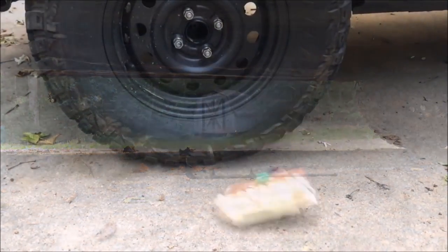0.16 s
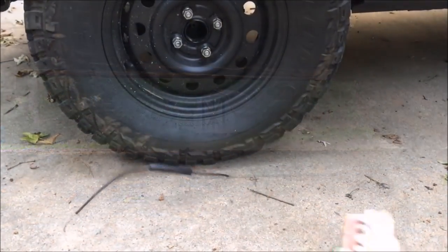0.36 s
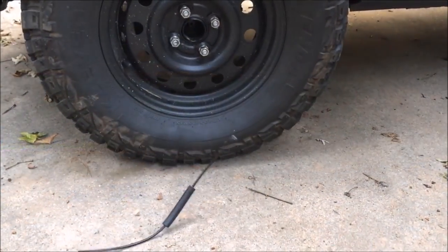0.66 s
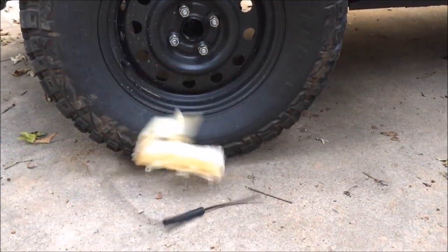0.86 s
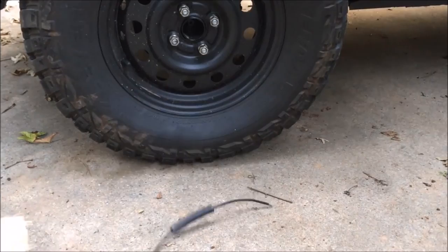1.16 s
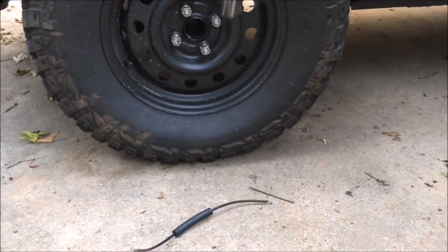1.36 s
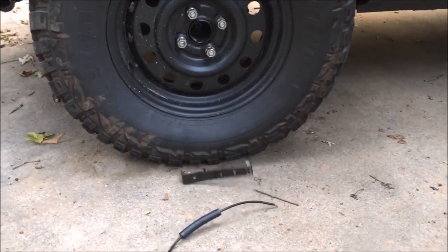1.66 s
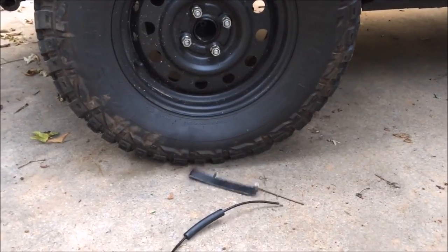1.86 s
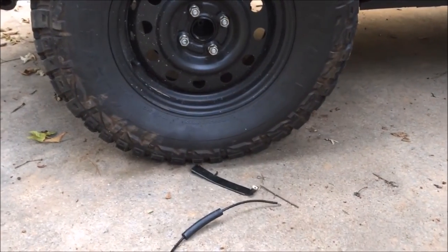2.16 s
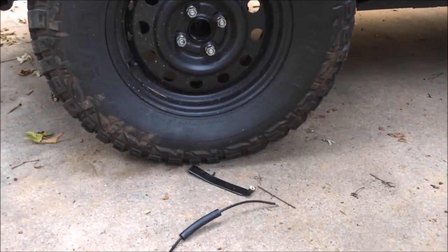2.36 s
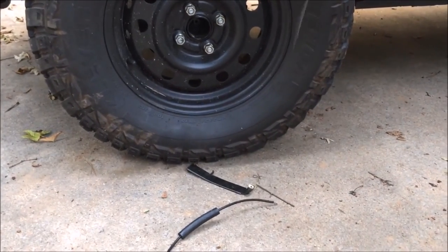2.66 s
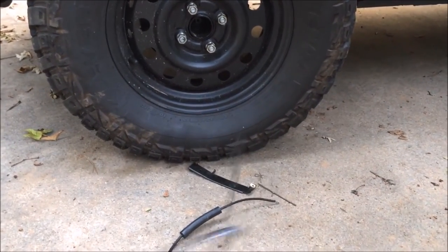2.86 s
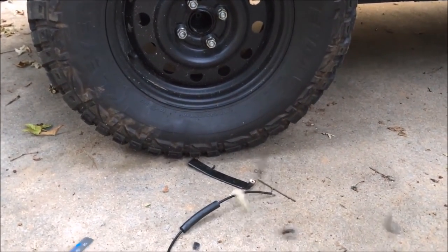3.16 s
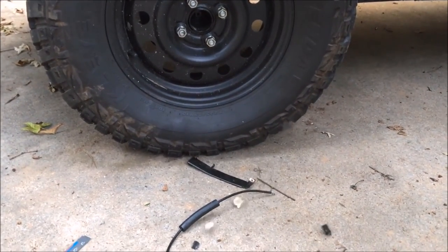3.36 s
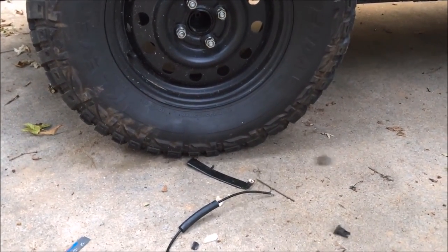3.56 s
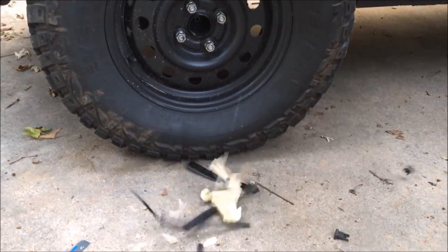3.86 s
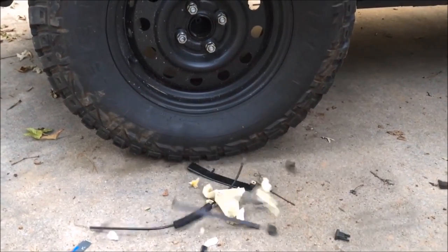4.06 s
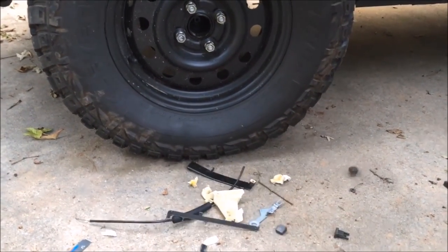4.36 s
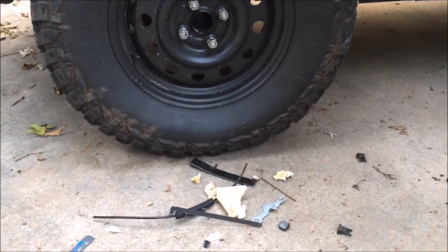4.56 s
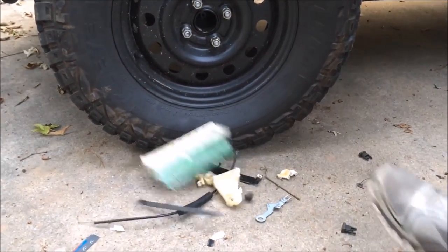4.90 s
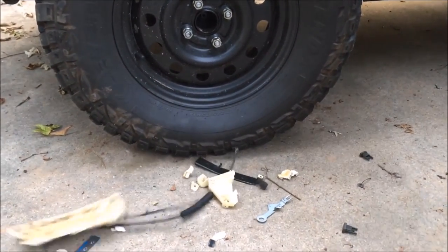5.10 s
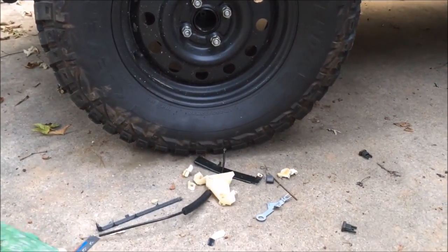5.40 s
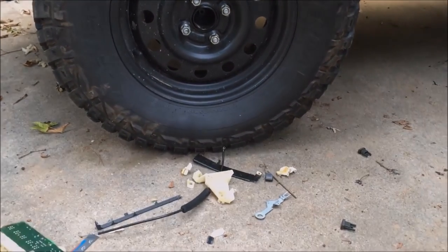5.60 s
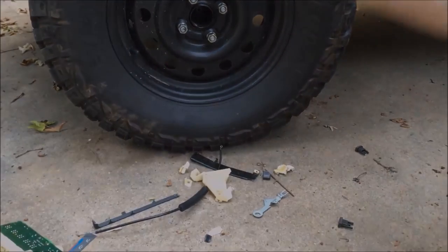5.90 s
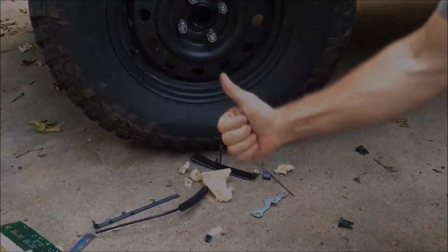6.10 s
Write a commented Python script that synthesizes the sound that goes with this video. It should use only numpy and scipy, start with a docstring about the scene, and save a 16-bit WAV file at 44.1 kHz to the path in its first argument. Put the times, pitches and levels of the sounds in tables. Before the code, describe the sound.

Broken plastic appliance parts drop onto a concrete driveway: hollow knocks, a raked rattle, bright bouncing pings, then a last burst of dry clacks.

```python
"""A hollow plastic casing scrapes, then tumbles over a concrete driveway beside a parked tyre, ringing on its modes.
Strips and boards of the broken appliance clack and bounce as bursts of noise and brief modes.
A heap is raked up as dense random grains; a short squeak and small bits that ping are close pairs of modes.
A garage close by adds a short tail of decaying noise; the loudest blows overload the microphone."""
import sys
import numpy as np
from scipy import signal
from scipy.fft import rfft, irfft, next_fast_len
from scipy.io import wavfile
from scipy.ndimage import uniform_filter1d

SR = 44100
rng = np.random.default_rng(int(sys.argv[2]) if len(sys.argv) > 2 else 0)


def digitize_waveform(pressure):
    """Quantize a signal to 16-bit integers and store it at the path in sys.argv[1].

    Rows of a 2-D input are taken as channels; values are limited to [-1, 1].
    """
    field = np.atleast_2d(pressure).T
    bounded = np.clip(field, -1, 1)
    quanta = np.round(bounded * 32767).astype(np.int16)
    wavfile.write(sys.argv[1], SR, quanta)


N = 275138
HIT_T = np.arange(SR * 3 // 4) / SR   # time axis of one hit [s]
BLOW_S = .025   # reference length for the energy of a hit

# casing modes: mode_hz, relative_db
CASING_MODES = [(160, -25), (320, -15.5), (458, -15.5), (662, -4.5), (700, -6), (903, -4.5), (975, -2.5),
                (1062, -1), (1166, 0), (1270, -6), (1335, -7.5), (1570, -1), (1640, -2), (1725, -9),
                (1878, 4), (1930, 2.5), (2070, -3.5), (2270, -2.5), (2500, -8.5), (2925, -1), (3450, -11.5),
                (3950, -13.5)]
# spectrum of plastic on concrete: freq_hz, relative_db
CLACK_SPECTRUM = [(200, -4.5), (560, -5), (840, -4), (1200, 1.5), (2350, 9), (3000, -2), (4300, -0.5),
                  (4800, -5), (5700, 4), (7700, -6), (10700, -10.5), (16000, -13.5)]


def amp(db):
    """Decibels to gain."""
    return 10 ** (np.asarray(db) / 20)


def unit(x):
    """Scale to rms 1."""
    return x / np.sqrt(np.mean(x ** 2) + 1e-20)


def unit_blow(x):
    """Scale a hit to the energy of rms 1 over BLOW_S."""
    return x / np.sqrt(np.sum(x ** 2) / (BLOW_S * SR) + 1e-20)


def add(track, start_s, sound):
    """Mix a sound into the track at a time."""
    start = max(0, round(start_s * SR))
    track[start:start + len(sound)] += sound[:len(track) - start]


def colour(x, points):
    """Filter by a spectrum of (freq_hz, db) points and scale to rms 1."""
    hz, db = np.transpose(points)
    size = next_fast_len(len(x))
    bins_hz = np.fft.rfftfreq(size, 1 / SR) + 1   # + 1 avoids log(0)
    gain = amp(np.interp(np.log(bins_hz), np.log(hz), db))
    return unit(irfft(rfft(x, size) * gain, size)[:len(x)])


def band(x, low_hz, high_hz):
    """Causal band-pass, its upper edge kept below Nyquist."""
    edges_hz = [low_hz, min(high_hz, .47 * SR)]
    return signal.sosfilt(signal.butter(3, edges_hz, "band", fs=SR, output="sos"), x)


def level(curve):
    """Gain in time from a curve of (time_s, db); silent outside it."""
    return amp(np.interp(np.arange(N) / SR, *np.transpose(curve), left=-np.inf, right=-np.inf))


def swells(rows, curve=1.5):
    """Gain of gestures that build, hold and die; curve > 1 starts attacks and ends releases more gently."""
    t = np.arange(N) / SR
    gain = np.zeros(N)
    for start_s, db, attack_s, hold_s, release_s in rows:
        rise = (t - start_s) / attack_s
        fall = 1 - (t - start_s - attack_s - hold_s) / release_s
        gain += amp(db) * np.clip(np.minimum(rise, fall), 0, 1) ** curve
    return gain


def fade(t60_s, rise_s, hold_s):
    """Envelope of a contact: it builds, lasts while the piece slaps down, then dies."""
    decay_db = -60 * np.clip((HIT_T - hold_s) / t60_s, 0, 4)
    return np.minimum(HIT_T / rise_s, 1) * amp(decay_db)


def ring(modes, t60_s, scatter_db, damping=0.64):
    """Damped modes (hz, db) of scattered strength; t60_s holds at 2 kHz, lower modes last longer."""
    out = np.zeros(len(HIT_T))
    for hz, db in modes:
        life_s = t60_s * (2000 / hz) ** damping
        t = HIT_T[:int(2 * life_s * SR)]
        strength = amp(db + scatter_db * rng.standard_normal())
        tone = np.sin(2 * np.pi * (hz * t + rng.random()))
        out[:len(t)] += strength * amp(-60 * t / life_s) * tone
    return out


def contact(t60_s, rise_s, hold_s):
    """Plastic on gritty concrete: countless short, overlapping modes, made as a noise burst."""
    return colour(rng.standard_normal(len(HIT_T)), CLACK_SPECTRUM) * fade(t60_s, rise_s, hold_s)


def echoed(sound):
    """A hit plus two short echoes, each with a random delay and a random sign."""
    # echoes from slab and tyre: typical_delay_s, level_db
    echoes = [(.0024, -3.5), (.006, -9)]
    out = np.zeros(len(sound))
    add(out, 0, sound)
    for delay_s, db in echoes:
        add(out, delay_s * rng.uniform(.65, 1.35), amp(db) * sound * rng.choice([-1, 1]))
    return out


def outdoor_air(level_db=-50):
    """Steady outdoor hum and hiss: filtered noise."""
    # air spectrum: freq_hz, relative_db
    air_spectrum = [(25, -20.5), (70, -4.5), (102, 2.5), (160, -15), (400, -25.5), (1800, -28.5),
                    (5000, -29.5), (9000, -40.5), (16000, -39)]
    return amp(level_db) * colour(rng.standard_normal(N), air_spectrum)


def garage(x, wet_db=-19.0, low_t60_s=0.4, high_t60_s=0.3):
    """Diffuse reflections from the vehicle and the garage; the treble dies first."""
    noise = rng.standard_normal(len(HIT_T))
    low = band(noise, 100, 2900) * fade(low_t60_s, rise_s=0.0068, hold_s=0)
    high = band(noise, 1900, 17000) * fade(high_t60_s, rise_s=0.024, hold_s=0)
    tail = low + high
    return amp(wet_db) * signal.fftconvolve(x, tail / np.sqrt(np.sum(tail ** 2)))[:N]


def grains(per_s, low_hz, high_hz, cycles, spread_db, count=24):
    """Random tiny collisions ring fragments of many sizes for a set number of cycles; each also ticks."""
    sizes = amp(spread_db * np.minimum(rng.exponential(1, N), 3)) * rng.choice([-1, 1], N)
    clicks = sizes * (rng.random(N) < per_s / SR)
    fragment = rng.integers(0, count, N)
    ringing = np.zeros(N)
    for k, hz in enumerate(np.geomspace(low_hz, high_hz, count)):
        radius = amp(-60 * hz / (cycles * SR))   # -60 dB after `cycles` periods
        w = 2 * np.pi * hz / SR
        struck = clicks * (fragment == k) + 1e-18
        ringing += signal.lfilter([hz * np.sin(w)], [1, -2 * radius * np.cos(w), radius * radius], struck)
    return unit(ringing) + .8 * unit(clicks) + .3 * rng.standard_normal(N)


def heap_rattle(clumping_db=3.4):
    """Big pieces rattle in the raked heap, catching and letting go in clumps."""
    # strokes that stir or rake: start_s, level_db, attack_s, hold_s, release_s
    strokes = [(0.44, -45.5, 0.035, .11, .05), (0.82, -43, .03, .04, 0.064), (1.44, -35.5, .06, .06, .5),
               (1.98, -48, .06, 0.31, 0.11), (2.27, -26.5, .17, 0.13, 0.49),
               (2.92, -37, 0.028, 0.031, 0.087), (3.12, -44.5, .02, 0.039, 0.083),
               (3.44, -43.5, 0.038, .1, .05), (3.6, -25, 0.029, .035, .13),
               (3.8, -36, 0.023, 0.0092, 0.029)]
    # rattle spectrum: freq_hz, relative_db
    rattle_spectrum = [(40, -10), (150, -2), (420, -3), (720, -2.5), (1050, 0), (2300, -7), (3500, -9.5),
                       (7000, -23.5)]
    collisions = grains(per_s=1100, low_hz=300, high_hz=2700, cycles=17, spread_db=2.8)
    slips = unit(uniform_filter1d(rng.standard_normal(N), size=SR // 60))
    rattle = unit(colour(collisions, rattle_spectrum) * amp(clumping_db * slips))
    return swells(strokes) * rattle


def crumb_skitter():
    """Spilled crumbs skitter over the concrete as grains spread up to a high treble."""
    # spills: start_s, level_db, attack_s, hold_s, release_s
    spills = [(0.74, -49, .05, 0.11, 0.047), (2.385, -32, 0.026, 0.15, .36), (3.58, -32.5, .06, .12, 0.072),
              (3.97, -37, 0.041, .38, 0.092), (4.9, -20, .06, .015, .07), (5.02, -39, .04, 0.35, 0.44)]
    # skitter spectrum: freq_hz, relative_db
    skitter_spectrum = [(300, -30), (800, -4.5), (1600, 0.5), (2600, 6), (3400, 1), (4700, 5.5),
                        (7000, -0.5), (10600, -8.5), (15000, -7.5)]
    collisions = grains(per_s=650, low_hz=1400, high_hz=15000, cycles=80, spread_db=3.8)
    return swells(spills) * colour(collisions, skitter_spectrum)


def heap_knocks(gain_db=-11.5):
    """Dull knocks as the heap shifts: short, heavily damped resonances."""
    # knocks: start_s, relative_db
    knocks = [(1.91, -34), (2.367, -18.5), (2.383, -14.5), (2.411, -16.5), (2.433, -12), (2.462, -16.5),
              (2.512, -16), (3.618, -19), (3.642, -16.5)]
    # heap resonances: mode_hz, relative_db
    heap_modes = [(323, -8.5), (490, -5), (711, 4.5), (1030, 4), (1350, -10), (1830, -8)]
    out = np.zeros(N)
    for start_s, db in knocks:
        knock = band(ring(heap_modes, t60_s=.016, scatter_db=3.0), 200, 2500)
        add(out, start_s, amp(db + gain_db) * unit_blow(knock))
    return out


def thumps(gain_db=-10.0):
    """Heavy pieces thump: decaying noise, mostly bass."""
    # thumps: start_s, relative_db
    thump_hits = [(0.222, -11), (0.334, -17), (1.034, -21), (1.355, -30), (1.664, -24), (3.992, -32.5),
                  (5.103, -22), (5.48, -27.5)]
    # thump spectrum: freq_hz, relative_db
    thump_spectrum = [(30, -14), (70, -3.5), (160, -0.5), (240, -1.5), (400, -18), (1000, -11.5),
                      (2500, -29.5), (6000, -56)]
    out = np.zeros(N)
    for start_s, db in thump_hits:
        noise = colour(rng.standard_normal(len(HIT_T)), thump_spectrum)
        thump = noise * fade(t60_s=0.24, rise_s=0.001, hold_s=0.0053)
        add(out, start_s, amp(db + gain_db) * unit_blow(thump))
    return out


def metal_strip():
    """A thin steel strip keeps ringing on its modes after it lands."""
    # landings: start_s, relative_db
    strip_hits = [(1.748, -36.5), (2.036, -41)]
    # strip modes: mode_hz, relative_db
    strip_modes = [(1625, 8), (1895, 6), (3914, -3), (5033, -5), (5362, -11.5), (6148, -9), (6632, -8),
                   (8635, -7), (9685, -8)]
    out = np.zeros(N)
    for start_s, db in strip_hits:
        add(out, start_s, amp(db) * ring(strip_modes, t60_s=.42, scatter_db=2.0, damping=.2))
    return out


def ringing_part(hits, modes, t60_s):
    """A struck part rings on its own modes after a 3.7 ms rise."""
    out = np.zeros(N)
    for start_s, db in hits:
        tone = ring(modes, t60_s, scatter_db=2.5, damping=.3) * np.minimum(HIT_T / 0.0037, 1)
        add(out, start_s, amp(db) * unit_blow(tone))
    return out


def rocking_board():
    """A stiff board rings briefly as it rocks on an edge."""
    # rocks: start_s, level_db
    board_hits = [(5.053, -27), (5.652, -34.5)]
    # board modes: mode_hz, relative_db
    board_modes = [(1378, -0.5), (1997, -3), (2560, 1.5), (2902, -1.5), (3440, -4), (4100, -2)]
    return ringing_part(board_hits, board_modes, t60_s=.075)


def bracket():
    """A small steel bracket jingles on its modes, longer than the board."""
    # jingles: start_s, level_db
    bracket_hits = [(4.19, -36.5), (4.294, -30.5)]
    # bracket modes: mode_hz, relative_db
    bracket_modes = [(716, -12), (2595, -1), (4619, -6), (8559, 0), (13080, -2), (14840, 4)]
    return ringing_part(bracket_hits, bracket_modes, t60_s=0.21)


def tinkles(count=32, from_s=3.0, to_s=4.8, centre_hz=4900, centre_db=-35.5):
    """Faint bounces at uneven intervals, as rows of start_s, relative_db, main_mode_hz."""
    jitter, size, pitch = rng.uniform(-1.1, 1, (count, 3)).T
    times_s = np.linspace(from_s, to_s, count) + jitter * (to_s - from_s) / count / 2
    return list(zip(times_s, centre_db + 3.0 * size, centre_hz * 2 ** (0.18 * pitch)))


def pings(ring_db=-15.5, overtone_db=-24.5, tick_db=-24.0):
    """Squeak and bouncing bits: a close pair of modes, faint overtones and a sharp tick."""
    # bounces, and one short squeak at 0.15 s: start_s, relative_db, main_mode_hz
    chirps = [(0.154, -5.5, 2320), (0.157, -8.5, 4030), (2.5386, -13, 4620), (2.5692, -14.5, 4710),
              (2.719, -21.5, 4640), (2.8568, -21.5, 4650), (3.0096, -12.5, 4320), (3.054, -19.5, 4410),
              (3.0875, -4, 4580), (3.1034, -5.5, 4620), (3.1262, -17, 4720), (3.2925, -7.5, 4660),
              (3.3363, -13.5, 4390), (3.3608, -23, 4150), (3.3882, -7.5, 4600), (3.4127, -12, 4860),
              (3.421, -15, 4620), (3.5054, -23, 3620), (3.5635, -18, 4650), (3.6768, -15, 4640),
              (3.7076, -7.5, 2730), (3.7383, -11.5, 4450), (3.7633, -13.5, 4660), (3.8698, -23, 4630),
              (3.921, -20.5, 4540), (3.9577, -19, 4600), (3.9784, -6.5, 2420), (4.0254, -3.5, 2556),
              (4.2212, -21, 4630), (4.269, -19.5, 4740), (4.336, -20, 4670), (4.5623, -16, 4770),
              (4.653, -32, 4700), (4.7452, -29.5, 5570)]
    # overtones: multiple_of_main_mode, relative_db
    bit_overtones = [(1.301, -11.5), (1.598, -12), (1.95, -4), (2.68, -9), (3.102, -7)]
    out = np.zeros(N)
    for start_s, db, main_hz in list(chirps) + tinkles():
        pair = ring([(main_hz, 0), (main_hz * .96, -7)], t60_s=.04, scatter_db=0)
        pair = unit_blow(pair * np.minimum(HIT_T / 0.0012, 1))
        upper_modes = [(main_hz * multiple, mode_db) for multiple, mode_db in bit_overtones]
        upper = unit_blow(ring(upper_modes, t60_s=0.042, scatter_db=8.0))
        burst = rng.standard_normal(len(HIT_T)) * fade(t60_s=0.063, rise_s=0.00037, hold_s=.001)
        tick = unit_blow(band(echoed(burst), 1595, 24000))
        add(out, start_s, amp(db) * (amp(ring_db) * pair + amp(overtone_db) * upper + amp(tick_db) * tick))
    return out


def clacks(gain_db=-1.5, ring_share=2.65, count=14):
    """Each flat piece gives a dry crack and brief modes of its own; its kind sets colour and decay."""
    # landings and bounces: start_s, relative_db, kind
    landings = [(0.308, -35, "clip"), (0.334, -13, "strip"), (0.362, -31.5, "strip"),
                (0.384, -19.5, "strip"), (0.436, -30.5, "strip"), (0.493, -30, "strip"),
                (0.586, -24, "strip"), (0.68, -15, "strip"), (0.705, -33, "strip"), (0.81, -33.5, "strip"),
                (0.914, -38.5, "strip"), (0.935, -32, "strip"), (0.983, -28, "strip"),
                (1.664, -18.5, "clip"), (1.746, -23.5, "clip"), (2.036, -25.5, "clip"),
                (2.061, -34, "wire"), (2.137, -37, "wire"), (2.199, -35, "wire"), (3.102, -27, "shard"),
                (3.279, -34.5, "wire"), (3.978, -24.5, "wire"), (3.989, -15.5, "wire"),
                (4.015, -18, "shard"), (4.032, -21, "shard"), (4.19, -34, "wire"), (4.294, -35.5, "wire"),
                (4.414, -32, "shard"), (4.875, -24, "strip"), (4.893, -17, "strip"), (4.94, -25, "wire"),
                (4.974, -18, "strip"), (4.987, -14.5, "shard"), (5.004, -20.5, "strip"),
                (5.062, -33, "board"), (5.088, -23.5, "strip"), (5.19, -38, "board"), (5.217, -27, "wire"),
                (5.242, -18.5, "strip"), (5.317, -27.5, "board"), (5.358, -25, "board"),
                (5.375, -19, "board"), (5.425, -38, "wire"), (5.46, -33.5, "strip"),
                (5.522, -33.5, "board"), (5.655, -36.5, "board"), (5.71, -37.5, "board"),
                (5.798, -38, "shard"), (5.82, -47, "wire"), (5.889, -44, "board"), (6.211, -48, "board")]
    # kinds of piece: body_db, crack_db, top_db, t60_s
    kinds = {"strip": (-0.5, 0.5, -3.5, .026), "clip": (-2, -2, 1, .021), "wire": (-2.5, 0, 0.33, .1),
             "shard": (-12.5, 0.5, -6.5, .03), "board": (-1.5, -9, -10.5, .034)}
    # edges between body, crack and top: edge_hz
    edges_hz = [220, 3000, 8000, 16500]
    out = np.zeros(N)
    for start_s, hit_db, kind in landings:
        *band_levels_db, t60_s = kinds[kind]
        hz = np.geomspace(1200, 15000, count) * 2 ** rng.uniform(-.15, .15, count)
        modes = zip(hz, np.interp(hz, *np.transpose(CLACK_SPECTRUM)))
        tone = ring(modes, ring_share * t60_s, scatter_db=1.0, damping=0.044)
        tone = tone * np.minimum(HIT_T / 0.00073, 1)
        crack = contact(t60_s, rise_s=0.00059, hold_s=0.002)
        hit = echoed(unit_blow(crack) + 0.57 * unit_blow(tone))
        clack = np.zeros(len(HIT_T))
        for k, db in enumerate(band_levels_db):
            part = amp(db) * unit_blow(band(hit, edges_hz[k], edges_hz[k + 1]))
            clack += part * (-1) ** k   # neighbouring bands in opposite polarity
        add(out, start_s, amp(hit_db + gain_db) * clack)
    return out


def casing_drag(scratch_db=-11.0):
    """Grit under the sliding casing keeps its modes humming: noise convolved with their ring."""
    # scrape before the tumble: time_s, level_db
    drag_curve = [(0, -29.5), (0.09, -33), (0.12, -21), (0.19, -23.5), (0.22, -45)]
    friction = rng.standard_normal(N)
    shell = band(ring(CASING_MODES, t60_s=.09, scatter_db=1), 1100, 1800)
    hum = unit(signal.fftconvolve(friction, shell)[:N])
    return level(drag_curve) * (hum + amp(scratch_db) * colour(friction, CLACK_SPECTRUM))


def casing_tumble(focus_db=9.5, focus_octaves=0.27, ring_db=-0.5, slap_db=-6.5, grit_db=-2.5):
    """The shell rings hollow; each hit favours modes near one pitch and detunes them a little."""
    # hits on the ground: start_s, relative_db, most_excited_hz, relative_scuff_db
    casing_hits = [(0.107, -16.5, 1720, -7.5), (0.138, -17, 1650, -15), (0.154, -17, 1700, -15),
                   (0.791, -28, 1460, -15), (1.034, -10, 1250, -7), (1.05, -13, 1160, -13),
                   (1.121, -25, 1880, -5), (1.218, -11.5, 1750, -20), (1.357, -3, 1580, -11),
                   (1.398, -11, 1730, -13), (1.42, -13.5, 2020, -15), (1.512, -17.5, 1390, -16),
                   (1.585, -24, 1300, -13.5), (1.606, -21.5, 1260, -14), (1.619, -20, 1240, -26),
                   (1.691, -18, 1740, -30), (1.813, -28, 1610, -6)]
    out = np.zeros(N)
    hz, db = np.transpose(CASING_MODES)
    for start_s, hit_db, main_hz, scuff_db in casing_hits:
        favour_db = focus_db * np.exp(-(np.log2(hz / main_hz) / focus_octaves) ** 2)
        detuned_hz = hz * (1 + .014 * rng.standard_normal(len(hz)))
        shell = ring(zip(detuned_hz, db + favour_db), t60_s=0.088, scatter_db=3.5, damping=.4)
        shell = unit_blow(echoed(shell))
        slap = echoed(contact(t60_s=0.072, rise_s=0.0013, hold_s=0.004))
        slap = unit_blow(band(slap, 500, 3800))
        grit = echoed(contact(t60_s=0.023, rise_s=0.00051, hold_s=0.0083))
        grit = unit_blow(band(grit, 2400, 16500))
        blow = amp(ring_db) * shell + amp(slap_db) * slap + amp(scuff_db + grit_db) * grit
        add(out, start_s, amp(hit_db) * blow)
    return out


def scene():
    """All falling pieces, their reflections and the outdoor air."""
    heap = heap_rattle() + crumb_skitter() + heap_knocks()
    ringing = metal_strip() + rocking_board() + bracket()
    pieces = heap + thumps() + ringing + pings() + clacks() + casing_drag() + casing_tumble()
    return (pieces + garage(pieces) + outdoor_air())[None]


def record(dry, top=1.4, cutoff_hz=16100):
    """The microphone flattens the loudest peaks towards top; the highest treble is cut."""
    clipped = dry / (1 + (dry / top) ** 4) ** (1 / 4)
    return signal.sosfilt(signal.ellip(10, .1, 70, cutoff_hz, fs=SR, output="sos"), clipped)


dry = scene()
out = record(dry)
digitize_waveform(out)
```